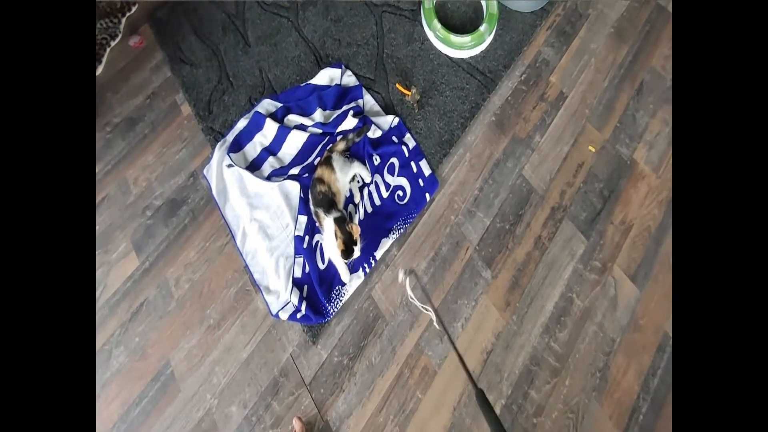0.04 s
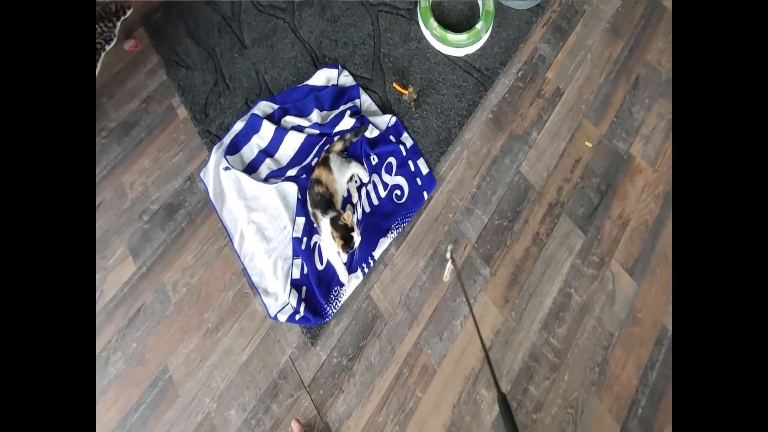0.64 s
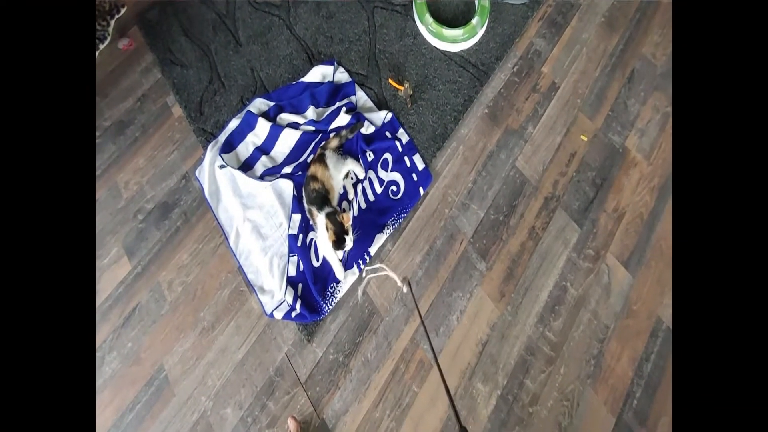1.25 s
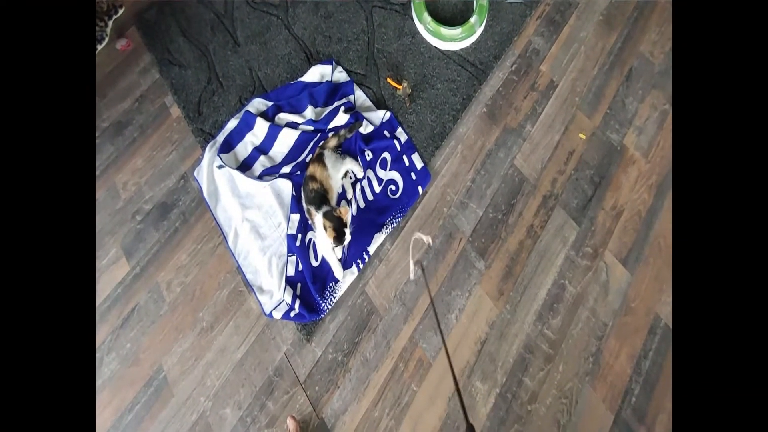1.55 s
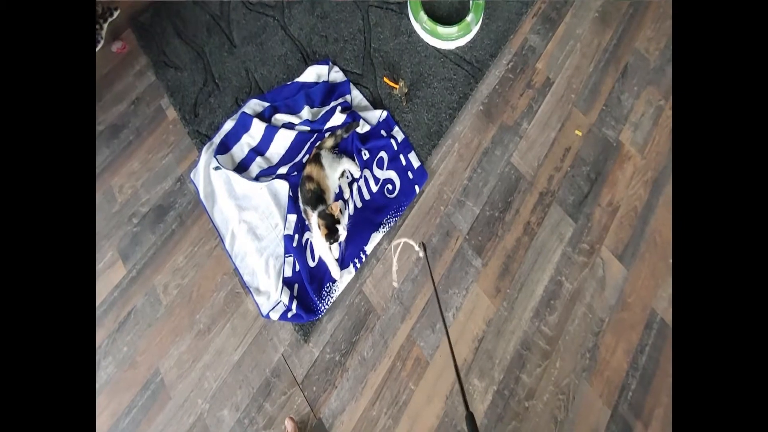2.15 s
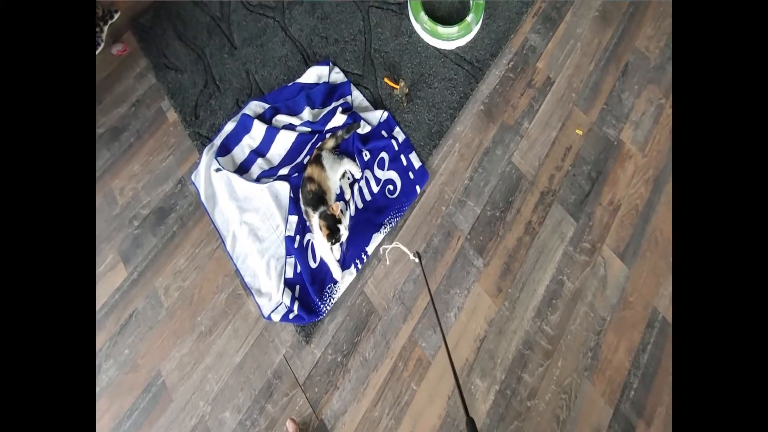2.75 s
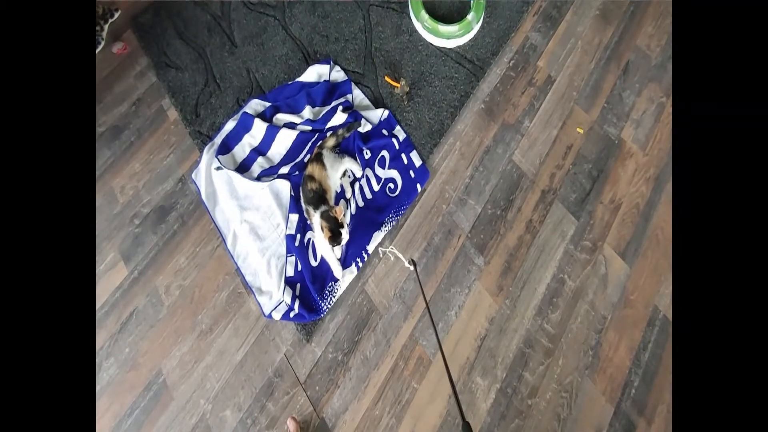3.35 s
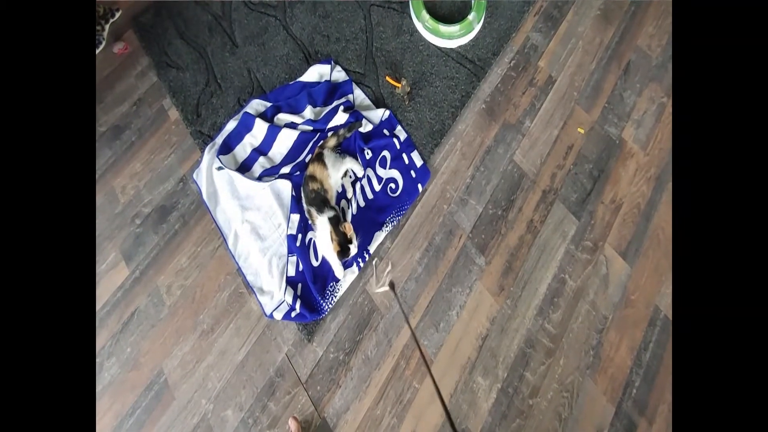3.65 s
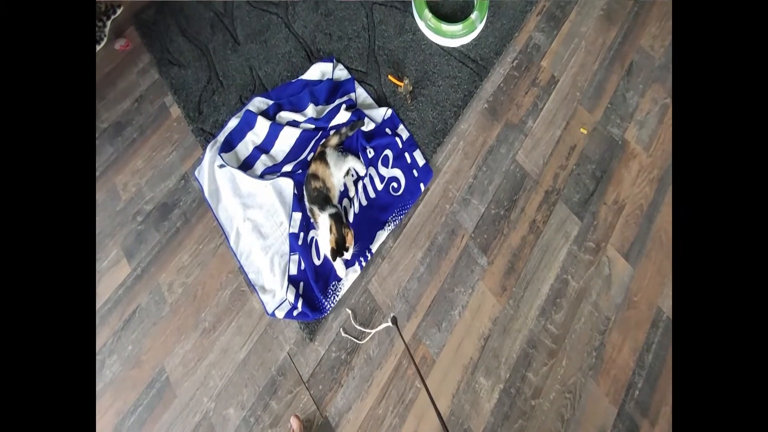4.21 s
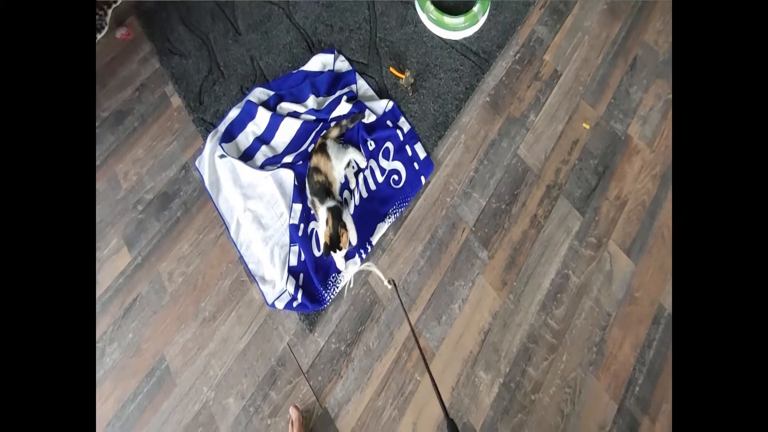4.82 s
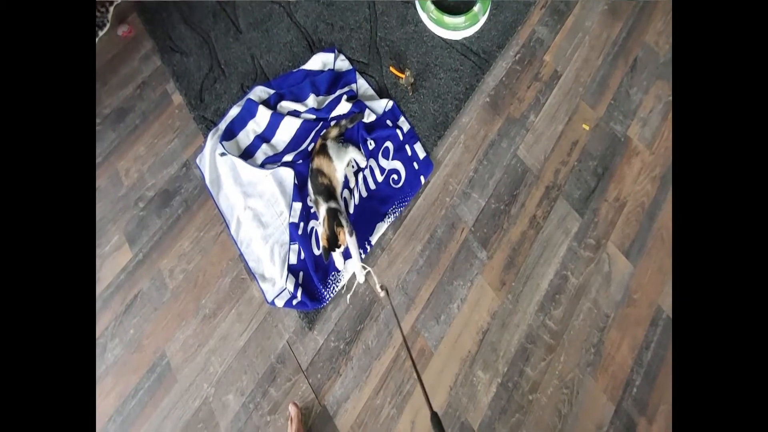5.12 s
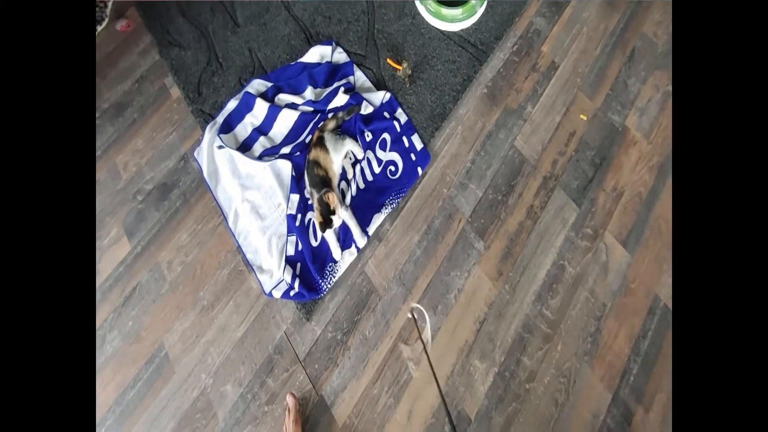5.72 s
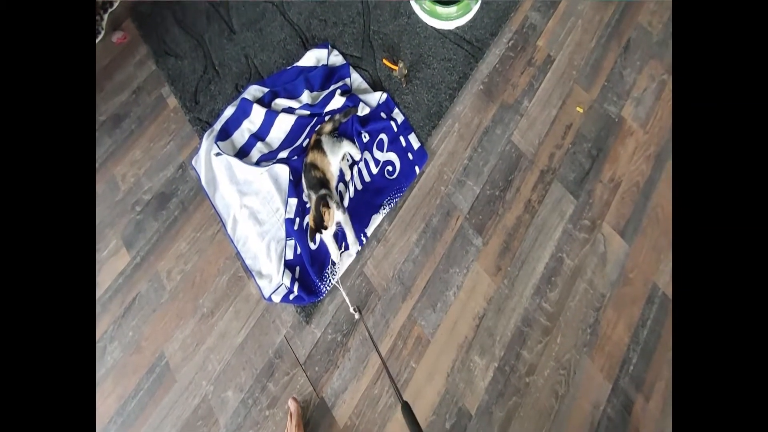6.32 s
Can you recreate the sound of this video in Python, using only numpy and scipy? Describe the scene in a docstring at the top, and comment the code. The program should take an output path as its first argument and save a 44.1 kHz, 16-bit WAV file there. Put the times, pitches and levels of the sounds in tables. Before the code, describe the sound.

Tiny metal bells tick and jingle brightly as a string toy is jerked indoors, pausing now and then and lightly brushing the floor.

```python
"""Small bells on the string of a wand toy are shaken in bursts for a kitten, in a room with a hard floor.
Each jerk throws the pellets inside against the metal shells: a tick, a choked ping near 5 kHz and a
thin lasting ring. Between jerks the pellets roll about, and the string taps and brushes the floor.
Behind the toy are two soft bumps, two faint far squeaks, a low hum, a drone, room air and hiss."""
import sys
import numpy as np
from scipy import signal
from scipy.fft import rfft, irfft, next_fast_len
from scipy.io import wavfile

SR = 44100
rng = np.random.default_rng(int(sys.argv[2]) if len(sys.argv) > 2 else 0)


def generate_wav(sig):
    """Save sig (samples, or channels by samples) to the path in sys.argv[1] as 16-bit PCM at SR."""
    pcm = np.round(np.clip(np.atleast_2d(sig).T, -1, 1) * 32767).astype(np.int16)
    wavfile.write(sys.argv[1], SR, pcm)


N = 285327
TIME = np.arange(N) / SR
FFT_SIZE = next_fast_len(N + SR)

# Pellets hitting the shells. A t60 is the time a sound takes to fade by 60 dB.
# t/s, level/dB, ping f/Hz, sparkle offset/dB, tick offset/dB, ping t60/s
BELL_HITS = [(.0577, -15, 4860, -38.5, -34, 0.013), (.1825, -24.5, 4900, -38, -32.5, 0.01),
             (.263, -31, 4810, -39, -40, .016), (.2932, -31.5, 4824, -32, -31, 0.047),
             (.3446, -30, 4890, -28, -46, 0.019), (.3874, -29.5, 4810, -33, -35, 0.04),
             (.4329, -44, 5090, -22, -42, 0.031), (.478, -35.5, 4930, -29, -27.5, 0.022),
             (.5871, -33.5, 4766, -32, -44, 0.016), (.6439, -42, 4970, -33, -40, 0.016),
             (1.019, -37.5, 5100, -17.5, -24, 0.009), (1.0896, -34.5, 4810, -37, -25, 0.029),
             (1.1293, -20, 4990, -44, -23, .01), (1.1975, -17, 4960, -29.5, -32, 0.022),
             (1.2688, -17.5, 4834, -23.5, -31, .015), (1.4002, -26, 4940, -53, -30.5, .012),
             (1.4875, -30, 4940, -43, -23.5, 0.084), (1.535, -18, 4905, -38, -30, 0.032),
             (1.5648, -12, 4804, -36, -30.5, 0.04), (1.6122, -13, 4810, -35, -31, 0.016),
             (1.6287, -8.5, 4890, -39, -29, 0.015), (1.66, -15.5, 4764, -36, -28.5, 0.036),
             (1.721, -19.5, 4964, -27.5, -19.5, 0.051), (1.7868, -29.5, 4790, -19, -22, 0.03),
             (1.9121, -25, 4920, -43, -23.5, 0.014), (2.0443, -37, 5050, -39, -30, 0.023),
             (2.0945, -30.5, 4930, -26, -15.5, 0.015), (2.1278, -19, 4858, -27.5, -25, 0.036),
             (2.2099, -25, 4890, -28, -25, 0.031), (2.3785, -39.5, 5020, -16.5, -22, 0.026),
             (3.1885, -72, 4760, -20, -21, .009), (3.39, -68, 4800, -16.5, -20, 0.0076),
             (3.5163, -52.5, 4960, -15, -27, .014), (3.5649, -26.5, 4882, -23.5, -30, 0.015),
             (3.6381, -25.5, 4904, -31.5, -32, 0.012), (3.8352, -45, 4910, -21, -31.5, 0.013),
             (4.5346, -60.5, 4960, -33.5, -27, .012), (4.6547, -54, 4880, -23.5, -33, 0.014),
             (4.7224, -51, 4920, -42.5, -34.5, 0.017), (4.8874, -46.5, 4870, -30, -17.5, .032),
             (4.9257, -37, 5040, -13, -20.5, 0.011), (4.9531, -23, 4930, -25.5, -29.5, 0.022),
             (4.9714, -25.5, 4935, -38, -45, 0.053), (5.019, -34.5, 4930, -27, -35, 0.038),
             (5.0734, -32.5, 4945, -32.5, -48, 0.02), (5.257, -44.5, 4900, -27, -18.5, 0.067),
             (5.3102, -44.5, 4700, -8, -13, .019), (5.3337, -27, 4945, -23, -32, 0.033),
             (5.3445, -20, 4860, -37, -25.5, 0.021), (5.3685, -22, 4680, -25, -27.5, 0.012),
             (5.4136, -25.5, 4940, -49, -27, 0.018), (5.5268, -34, 4950, -22, -25, 0.09),
             (5.6092, -27.5, 4810, -37, -35, 0.013), (5.7546, -27, 4834, -10.5, -21, 0.042),
             (5.8134, -32.5, 4940, -37, -25.5, 0.022), (5.9239, -31, 4970, -25.5, -24.5, 0.021),
             (5.9492, -29.5, 5000, -54, -45, 0.016), (6.0851, -26.5, 4990, -51, -30.5, 0.015),
             (6.2657, -47, 4880, -40, -42, 0.014)]
# The shell's two lasting tones, heard as a chime: f/Hz, level/dB, t60/s
CHIME_TONES = [(5247, 0, .17), (5341, -4, .14)]
# Its higher tones, heard as sparkle: f/Hz, level/dB, t60/s
SPARKLE_TONES = [(11402, -9, .1), (11621, -4, .11), (11936, 0, .1), (12073, -2, .1), (12362, -2, .07),
                 (12583, -9, .08)]
# Tone colour of a pellet's tick: f/Hz, level/dB
TICK_COLOUR = [(800, -37), (2200, -11), (3100, -22.5), (4200, 1), (5500, 5.5), (6600, 2), (7800, -6),
               (9700, -12), (10600, -27.5), (11800, 2), (13200, -9.5), (15700, -18)]
def bell_strikes(ping_db=1.0, chime_db=5.0, sparkle_db=-4.0, tick_db=26.5, firm_db=-21, lead_s=.0007):
    """A pellet lands with a tick (a crack and a scrape); the shell then pings, chimes and sparkles."""
    t = TIME[:int(.2 * SR)]
    tones, ticks = np.zeros((2, 2, N))
    for start, level_db, hz, sparkle_offset, tick_offset, t60 in BELL_HITS:
        # the sharper the tick, the more the shell chimes
        chime = from_db(chime_db + .95 * tick_offset) * shell_ring(t, CHIME_TONES)
        sparkle = from_db(sparkle_db + sparkle_offset) * shell_ring(t, SPARKLE_TONES)
        ring = room(from_db(ping_db) * ping(t, hz, t60) + chime)
        ring += room(sparkle, early_db=-3.5, late_db=-8.5, late_t60=.12)   # high echoes die sooner
        add(tones, start, from_db(level_db) * ring)
        contact = from_db(level_db + tick_db + tick_offset)
        crack_db = -1 + .66 * min(level_db - firm_db, 0)   # soft hits hardly crack
        add(ticks, start - lead_s, contact * from_db(crack_db) * crack(t))
        add(ticks, start - lead_s, contact * room(scrape(t), early_db=-2.5, late_db=2.7))
    return tones + shape(ticks, from_db(at_bins(TICK_COLOUR)))


def ping(t, hz, t60=.013, swell_s=.00083):
    """One struck tone that swells and dies; in a bell, the pellet and string choke it quickly."""
    envelope = swell(t, swell_s) * fade(t, t60)
    return envelope / envelope.max() * np.sin(2 * np.pi * hz * t)


def shell_ring(t, tones, scatter_db=4.5, detune_hz=14.0, swell_s=.0015):
    """The shell rings on; the strength and exact pitch of each tone depend on where the pellet lands."""
    hz, level_db, t60 = np.transpose(tones)[:, :, None]
    strength = from_db(level_db + scatter_db * rng.standard_normal(hz.shape))
    strength *= rng.choice([-1, 1], hz.shape)
    pitch = hz + detune_hz * rng.standard_normal(hz.shape)
    return swell(t, swell_s) * np.sum(strength * fade(t, t60) * np.sin(2 * np.pi * pitch * t), axis=0)


def crack(t, t60=.0052):
    """The first instant of metal on metal: a tiny burst of noise."""
    return unit_energy(rng.standard_normal(len(t)) * fade(t, t60))


def scrape(t, t60=.01, swell_s=.0013, skid_db=-12.5, skid_t60=.14):
    """A pellet chatters briefly on the metal and skids on."""
    envelope = swell(t, swell_s) * (fade(t, t60) + from_db(skid_db) * fade(t, skid_t60))
    return unit_energy(rng.standard_normal(len(t)) * envelope)


# Shakes of the wand that set the pellets rolling: t/s, length/s, level/dB
WAND_SHAKES = [(.02, .15, -44), (.25, .25, -44), (.6, .12, -43), (.84, .08, -63), (1.005, .1, -48.5),
               (1.19, .27, -38), (1.56, .31, -32.5), (2.05, .03, -44), (2.14, .12, -36.5), (2.34, .31, -49),
               (3.0, .4, -87), (3.66, .08, -46.5), (4.18, 0.15, -79.5), (4.62, .22, -70),
               (4.95, .14, -47.5), (5.36, .2, -38.5), (5.78, .19, -46.5), (6.08, .16, -48.5),
               (6.44, .03, -59)]
def rolling_pellets(level_db=-3.8, top_touches_per_s=500, low_hz=4712, high_hz=5052, pitch_count=6,
                    chime_db=-33.5, sparkle_db=-41, tick_db=-5.5):
    """Loose pellets touch the shells lightly: lone ticks when calm, a shimmer when stirred."""
    t = TIME[:int(.2 * SR)]
    stir_db = gestures_db(WAND_SHAKES, rise=350.5, sag=27, fall=258)
    chance = top_touches_per_s * from_db(.35 * (stir_db - stir_db.max())) / SR
    size, hardness = np.clip(rng.standard_normal((2, N)), -2, 2)
    touches = (rng.random(N) < chance) / np.sqrt(chance) * from_db(4 * size)
    touches = rms_one(touches) * from_db(stir_db + level_db) / np.linalg.norm(ping(t, low_hz))
    glints = touches * rms_one(from_db(5.5 * hardness))   # harder touches sparkle and tick more
    which_pitch = rng.integers(0, pitch_count, N)
    tones = np.zeros(N)
    for k, hz in enumerate(np.linspace(low_hz, high_hz, pitch_count)):
        ring = ping(t, hz, t60=.012, swell_s=.001) + from_db(chime_db) * shell_ring(t, CHIME_TONES)
        sparkle = from_db(sparkle_db) * shell_ring(t, SPARKLE_TONES)
        tones += signal.fftconvolve(touches * (which_pitch == k), ring)[:N]
        tones += signal.fftconvolve(glints * (which_pitch == k), sparkle)[:N]
    cracks = signal.fftconvolve(glints, crack(t))[:N]
    ticks = shape(cracks, from_db(tick_db + at_bins(TICK_COLOUR)))
    return room(tones + ticks, early_db=-2.5, late_db=-5.5)


# String and wand tapping the floor: t/s, level/dB
FLOOR_TAPS = [(3.567, -43.5), (3.577, -47.5), (4.856, -40.5), (4.8805, -45), (5.33, -53), (5.552, -40)]
# Tone colour of a tap: f/Hz, level/dB
TAP_COLOUR = [(80, -3.5), (170, 7.5), (400, 10.5), (1000, 11.5), (1500, -3), (2200, 14), (3200, -10.5),
              (6500, 4), (10000, -33), (15000, -41.5)]
def floor_taps(gain_db=-9.5, t60=.022, drag_db=-20, drag_t60=.13):
    """The toy meets the floor with short, dull taps, each followed by a little drag."""
    out, t = np.zeros(N), TIME[:SR // 4]
    envelope = fade(t, t60) + from_db(drag_db) * fade(t, drag_t60)
    for start, level_db in FLOOR_TAPS:
        add(out, start, from_db(level_db + gain_db) * rng.standard_normal(len(t)) * envelope)
    return room(shape(out, from_db(at_bins(TAP_COLOUR))))


# Strokes of the string along the floor: t/s, length/s, level/dB
STRING_STROKES = [(.02, 0.32, -64), (.92, 0.03, -57), (1.09, 0.045, -56), (4.86, 0.012, -58),
                  (5.345, 0.021, -55), (5.56, 0.043, -70)]
# Tone colour of the rustle: f/Hz, level/dB
RUSTLE_COLOUR = [(500, -3), (1800, -15), (2400, -2.5), (3300, -11.5), (5500, -4.5), (6600, 0.5),
                 (7700, -14), (15000, -18.5)]
def string_brush():
    """The string rustles over the floor in short strokes."""
    level_db = gestures_db(STRING_STROKES, rise=908, sag=24, fall=278)
    return from_db(level_db) * stereo_noise(RUSTLE_COLOUR)


# Soft bumps on the floor: t/s, level/dB, f/Hz, t60/s
FLOOR_BUMPS = [(1.246, -46, 69.9, 0.11), (3.563, -54, 151, 0.13)]
def floor_bumps():
    """A soft blow on the floor sounds one low, short tone."""
    out, t = np.zeros(N), TIME[:SR // 4]
    for start, level_db, hz, t60 in FLOOR_BUMPS:
        add(out, start, from_db(level_db) * ping(t, hz, t60, swell_s=.005))
    return out


# Two faint squeaks: t/s, length/s, top f/Hz, level/dB
FAR_SQUEAKS = [(2.032, .07, 438.4, -65.5), (3.192, 0.21, 974, -66.5)]
def far_squeaks(width_hz=85, octave_db=-9.5, flat_share=.13, glide_s=.025):
    """A thin, hoarse tone and its octave start flat and glide up, blurred by distance."""
    out = np.zeros(N)
    for start, length, top_hz, peak_db in FAR_SQUEAKS:
        hz = top_hz * (1 - flat_share * np.exp(-np.maximum(TIME - start, 0) / glide_s))
        level_db = gestures_db([(start, length, peak_db)], rise=698, sag=32, fall=552)
        tone = unsteady_tone(hz, width_hz) + from_db(octave_db) * unsteady_tone(2 * hz, 2 * width_hz)
        out += from_db(level_db) * tone
    return room(out)


# Moments when the hum swells: middle t/s, half width/s, level/dB
HUM_RISES = [(.85, 0.2, -50.5), (1.45, .33, -60.5), (5.03, 0.075, -65)]
def low_hum(hz=83.7, waver_hz=3.4, steady_db=-71, gain_db=-1.5):
    """A low hum wavers in pitch and grows louder now and then."""
    swells = sum(from_db(db) * np.exp(-((TIME - middle) / width) ** 2) for middle, width, db in HUM_RISES)
    pitch = hz + waver_hz * unsteady_tone(0, width_hz=10)   # at 0 Hz only the wandering is left
    tone = np.sqrt(2) * np.sin(2 * np.pi * np.cumsum(pitch) / SR)
    return from_db(gain_db) * (from_db(steady_db) + swells) * tone


# How the drone's pitch and loudness move: t/s, f/Hz, level/dB
DRONE_PATH = [(0, 156.1, -70), (1.5, 156.4, -70), (2.9, 156.7, -78.5), (3.9, 156.9, -78),
              (4.15, 177.1, -75.5), (4.9, 176.7, -67), (5.25, 156.6, -79), (5.9, 157, -73.5),
              (6.47, 158, -64.5)]
def drone(width_hz=9.9):
    """A faint, unsteady tone about an octave above the hum."""
    times, hz, level_db = np.transpose(DRONE_PATH)
    strength = from_db(np.interp(TIME, times, level_db))
    return strength * unsteady_tone(np.interp(TIME, times, hz), width_hz)


# Tone colour of the room air: f/Hz, level/dB
AIR_COLOUR = [(15, -42.5), (25, -8), (91, -2), (119, -6.5), (166, -10), (310, -7.5), (343, -9), (381, -12),
              (510, -13), (590, -17), (773, -17.5), (913, -13.5), (1440, -21), (2280, -19), (3600, -37.5),
              (4680, -75), (7920, -120)]
# Tone colour of the microphone hiss: f/Hz, level/dB
HISS_COLOUR = [(2500, -12.5), (4000, -1.5), (7000, -7), (10800, -16), (12000, 2.5), (15600, -3)]
def air_and_hiss(air_db=-63.27, hiss_db=-76):
    """Room air makes a steady low rush; the microphone adds a thin hiss."""
    return from_db(air_db) * stereo_noise(AIR_COLOUR) + from_db(hiss_db) * stereo_noise(HISS_COLOUR)


# How alike left and right are: f/Hz, likeness (1 the same, -1 opposite)
STEREO_LIKENESS = [(30, 1), (120, 0.84), (280, 0.88), (500, 0.57), (1000, 0.17), (2200, -0.25),
                   (6000, -0.71)]
def stereo_noise(colour):
    """Noise with a given tone colour, alike on both sides only in the bass."""
    mid, side = rng.standard_normal((2, N))
    alike = np.clip(at_bins(STEREO_LIKENESS), -1, 1)
    gain = from_db(at_bins(colour))
    shared = shape(mid, gain * np.sqrt(1 + alike))
    opposed = shape(side, gain * np.sqrt(1 - alike)) * [[1], [-1]]
    return rms_one(shared + opposed)


def room(sound, early_db=-3, late_db=-2, early_t60=.12, late_t60=.4, gap_s=.0049):
    """The room adds near echoes and a soft tail; new on each call, as the toy keeps moving."""
    t = TIME[:int(.55 * SR)]
    early, late = rng.standard_normal((2, 2, len(t))) * (t > gap_s)
    response = from_db(early_db) * unit_energy(early * fade(t, early_t60))
    response += from_db(late_db) * unit_energy(late * fade(t, late_t60))
    response[:, 0] += 1   # the direct sound reaches both sides together
    return signal.fftconvolve(sound[None], response, axes=-1)[:, :N]


def gestures_db(rows, rise, sag, fall):
    """Each gesture rises to its start, sags while it lasts, then falls (in dB/s); the loudest wins."""
    levels = []
    for start, length, level_db in rows:
        t = TIME - start
        drop_db = rise * np.maximum(-t, 0) + sag * np.clip(t, 0, length)
        drop_db += fall * np.maximum(t - length, 0)
        levels.append(level_db - np.minimum(drop_db, 150))
    return np.max(levels, axis=0)


def unsteady_tone(hz, width_hz):
    """A tone whose strength and phase wander; the wider it is, the rougher it sounds."""
    slow = shape(rng.standard_normal((2, N)), at_bins([(width_hz / 2, 1), (width_hz * 2, 0)]))
    phase = 2 * np.pi * np.cumsum(hz * np.ones(N)) / SR
    return rms_one(slow[0] * np.cos(phase) + slow[1] * np.sin(phase))


def swell(t, swell_s):
    """A soft start that rises from 0 to 1."""
    return (1 - np.exp(-t / swell_s)) ** 2


def fade(t, t60):
    """Die away by 60 dB every t60 seconds."""
    return from_db(-60 * t / t60)


def from_db(db):
    """Turn decibels into a multiplier."""
    return 10 ** (np.asarray(db) / 20)


def rms_one(x):
    """Scale to an average strength (rms) of 1."""
    return x / np.sqrt(np.mean(x ** 2) + 1e-20)


def unit_energy(x):
    """Scale each channel to a total energy of 1."""
    return x / np.sqrt(np.sum(x ** 2, axis=-1, keepdims=True))


def at_bins(points):
    """Join a table's points into a curve with one value per frequency step (FFT bin)."""
    hz, value = np.transpose(points)
    return np.interp(np.log(np.fft.rfftfreq(FFT_SIZE, 1 / SR) + 1), np.log(hz), value)


def shape(x, gain):
    """Turn each frequency up or down by its gain."""
    return irfft(rfft(x, FFT_SIZE) * gain, FFT_SIZE)[..., :N]


def add(out, start_s, sound):
    """Mix a sound in at a given time."""
    start = int(np.clip(round(start_s * SR), 0, N - 1))
    out[..., start:start + sound.shape[-1]] += sound[..., :N - start]


def scene():
    """The bells, the sounds on the floor and the quiet room, all together."""
    bells = bell_strikes() + rolling_pellets()
    floor = floor_taps() + string_brush() + floor_bumps()
    return bells + floor + far_squeaks() + low_hum() + drone() + air_and_hiss()


# The microphone's two openings favour different pitches: f/Hz, left minus right level/dB
MIC_BALANCE = [(60, 2.5), (500, -1.5), (1000, -2), (2200, 8), (4400, 1.5), (4950, 2.5), (5250, -6.5),
               (5800, -5), (6500, 10), (7900, -6), (9000, 0.5), (12000, -4.5), (15500, -6.5)]
def record(dry, cutoff_hz=15850):
    """Each microphone opening colours its own side; the highest treble is cut steeply."""
    coloured = shape(dry, from_db(at_bins(MIC_BALANCE) * np.array([[.5], [-.5]])))
    treble_cut = signal.ellip(10, .2, 80, cutoff_hz, fs=SR, output="sos")
    return signal.sosfilt(treble_cut, coloured)


dry = scene()
out = record(dry)
generate_wav(out)
```